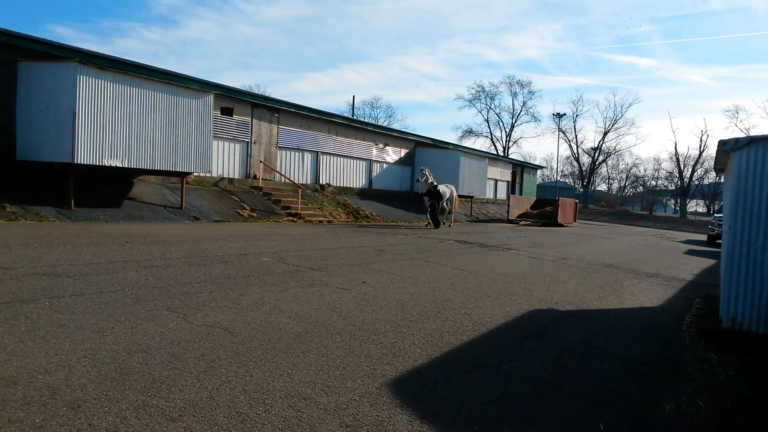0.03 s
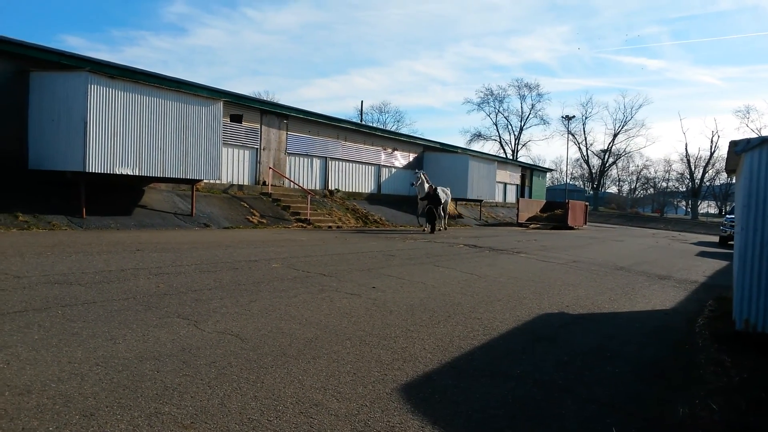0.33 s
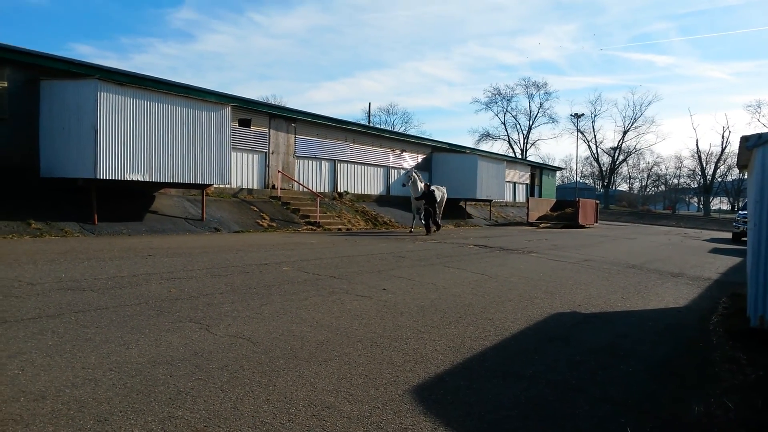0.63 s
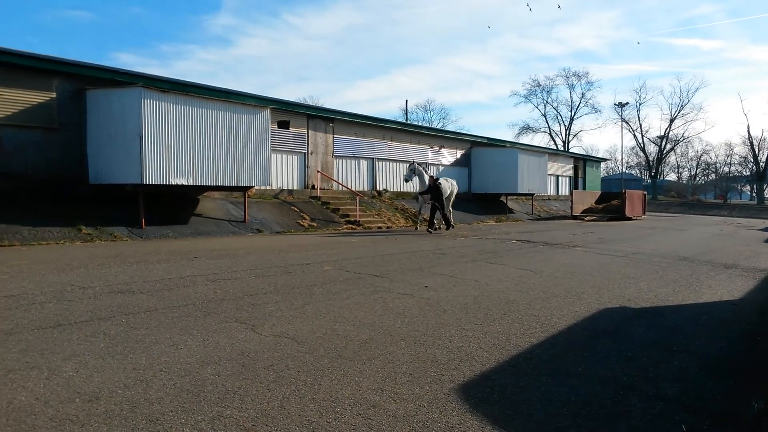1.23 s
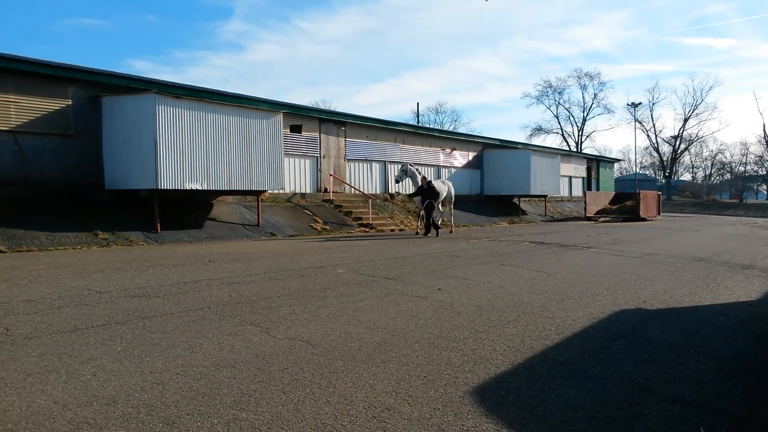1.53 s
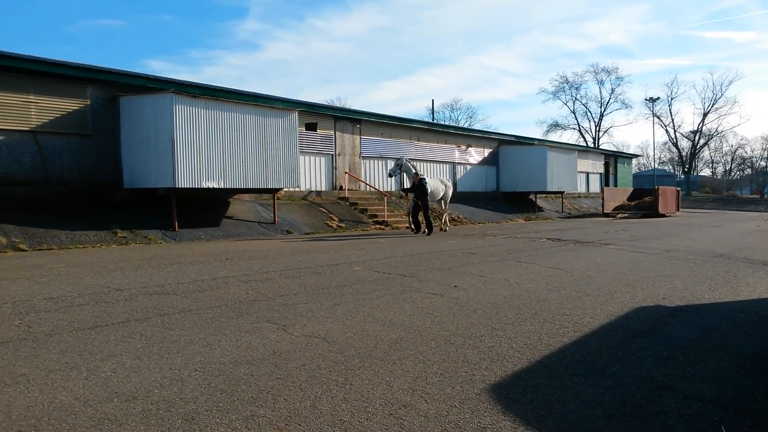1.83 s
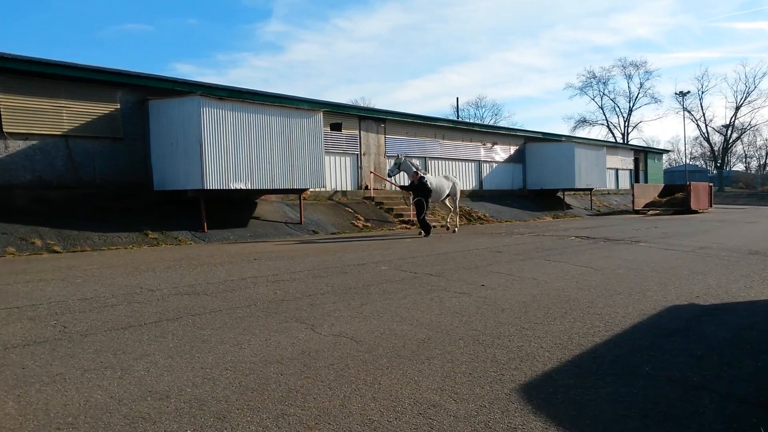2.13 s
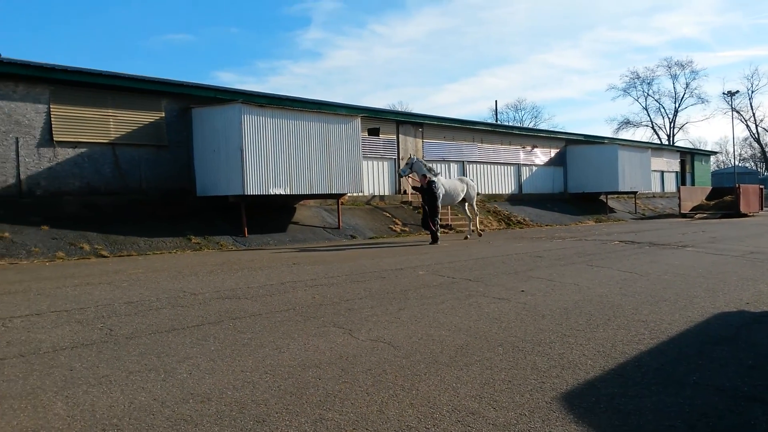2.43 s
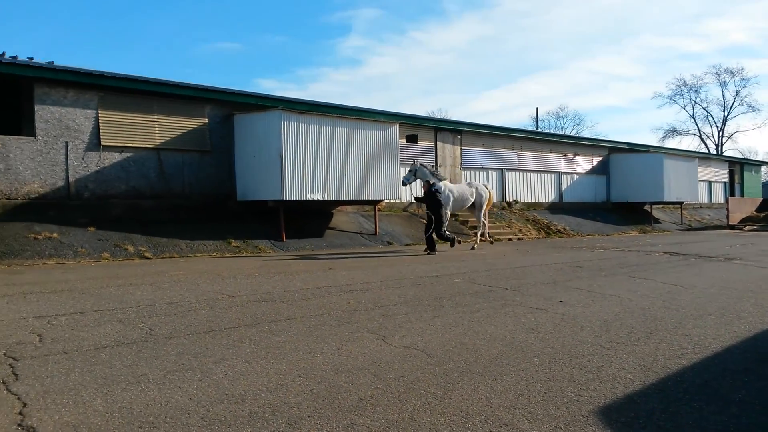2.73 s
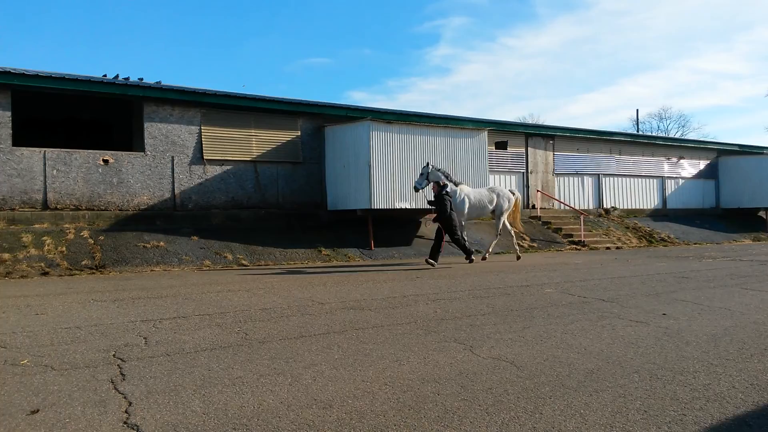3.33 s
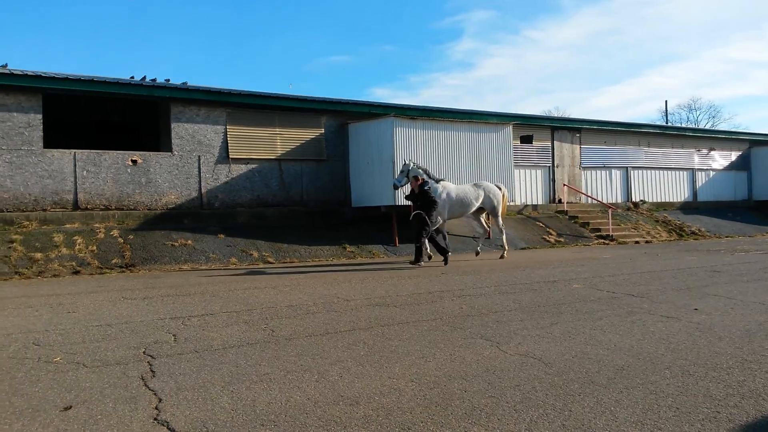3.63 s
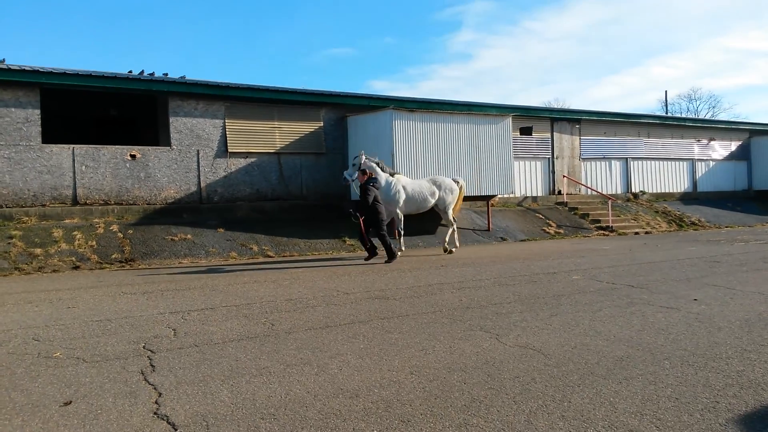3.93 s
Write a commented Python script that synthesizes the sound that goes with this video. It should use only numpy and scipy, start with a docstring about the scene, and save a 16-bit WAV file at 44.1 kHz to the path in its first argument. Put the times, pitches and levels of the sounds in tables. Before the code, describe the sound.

A horse trots steadily on asphalt while gusts of wind buffet the microphone.

```python
"""A horse is led at a trot across an asphalt lot, coming nearer along a low building.
Diagonal pairs of hooves land almost together. Each blow rings the hollow hoof (a clop) and crushes
grit (a crunch), and the walls answer. Shoes scuff between beats, and now and then a stone cracks.
Gusts buffet the microphones over a faint outdoor hiss; a light, even ticking is heard at first."""
import sys
import numpy as np
from scipy import signal
from scipy.io import wavfile
from scipy.ndimage import uniform_filter1d

SR = 44100
rng = np.random.default_rng(int(sys.argv[2]) if len(sys.argv) > 2 else 0)


def master(y):
    """Save y as 16-bit WAV."""
    cut = np.clip(np.atleast_2d(y).T, -1, 1)
    pcm = np.round(cut * 32767)  # scale
    wavfile.write(sys.argv[1], SR, pcm.astype(np.int16))


N = 176400
T = np.arange(N) / SR
LEFT, RIGHT = range(2)
# Two ways a hoof lands: roll_db (compared with the first touch), roll_decay_s, crunch_rise_s
FLAT, DRAGGED = (-3, 0.0029, .0004), (12, 0.01, 0.0034)


def amp(db):
    """Turn decibels into a number to multiply by."""
    return 10 ** (np.asarray(db) / 20)


def rms_one(x):
    """Scale a sound so that its average level (rms) is 1."""
    return x / np.sqrt(np.mean(x ** 2) + 1e-20)


def in_time(rows):
    """Join (time, value) points with straight lines, giving a value for every sample."""
    times, values = np.transpose(rows)
    return np.interp(T, times, values)


def at_hz(rows, hz, column=1):
    """Read a table at any pitch, blending between its rows on an octave scale."""
    rows = np.array(rows)
    return np.interp(np.log(hz), np.log(rows[:, 0]), rows[:, column])


def filt(x, hz, kind, order=2):
    """Keep the "low" part, the "high" part or one "band" of a sound."""
    sections = signal.butter(order, np.clip(hz, 10, .45 * SR), kind, fs=SR, output="sos")
    return signal.sosfilt(sections, x + 1e-18)


def drift(rate_hz):
    """A smooth random wobble with a typical size of 1."""
    step = 40   # samples between the random points
    r = np.exp(-2 * np.pi * rate_hz * step / SR)
    slow = signal.lfilter([1], [1, -2 * r, r * r], rng.standard_normal(N // step + 2002))[2000:]
    return np.interp(np.arange(N) / step, np.arange(len(slow)), rms_one(slow))


def ring(x, hz, ring_s):
    """Each click in x starts a pure tone that fades by 60 dB in ring_s."""
    r = np.exp(-np.log(1000) / (ring_s * SR))
    angle = 2 * np.pi * hz / SR
    return signal.lfilter([0, np.sin(angle)], [1, -2 * r * np.cos(angle), r * r], x + 1e-18)


def linger(energy, seconds):
    """Spread energy out so that it dies away gradually."""
    r = np.exp(-1 / (seconds * SR))
    return signal.lfilter([1 - r], [1, -r], energy + 1e-18)


def add(out, start_s, x):
    """Mix a sound in at a given time."""
    i = int(np.clip(start_s * SR, 0, N - 1))
    out[..., i:i + x.shape[-1]] += x[..., :N - i]


def noise_bands(count, lowest_hz=22):
    """Slices of stereo noise half an octave wide, each with its middle pitch."""
    white = rng.standard_normal((2, 2, N + 8000))
    edges = lowest_hz * 2 ** (np.arange(count + 1) / 2)
    for k in range(count):
        yield np.sqrt(edges[k] * edges[k + 1]), filt(white[k % 2], edges[k:k + 2], "band")[:, -N:]


def crunch(decay_s, per_s=5000, rise_s=0.00092, size=6000):
    """A burst of tiny random clicks that swells and dies away, with a total energy of 1."""
    t = T[:size]
    clicks = (rng.random(size) < per_s / SR) * rng.standard_normal(size)
    grains = clicks * np.exp(-t / decay_s) * (1 - np.exp(-t / rise_s))
    return grains / (np.linalg.norm(grains) + 1e-9)


def outdoor_hiss():
    """Smooth, far-off hiss that is loudest at the start."""
    # The tone of the hiss: pitch_hz, level_db
    tone = [(100, -42.5), (400, -95), (700, -57), (1100, -65), (1600, -66), (2500, -68), (3900, -69),
            (5000, -75), (6500, -72), (9000, -77), (12000, -87), (15000, -69)]
    # How the hiss rises and falls: time_s, level_db
    loudness = [(0, 10.5), (.5, 5.5), (1.0, 7), (2.1, 5.5), (2.5, 7.5), (2.95, 6.5), (3.05, 4), (3.3, 5.5),
                (3.45, -1.5), (4, 0)]
    hiss = sum(noise * amp(at_hz(tone, hz)) for hz, noise in noise_bands(count=19))
    return amp(-49 + in_time(loudness)) * rms_one(hiss)


def ticking(count=20, start_s=.1045, gap_s=.0249):
    """A short run of faint, even ticks close to the microphones."""
    out = np.zeros((2, N))
    for k in range(count):
        burst = np.array([crunch(.001), crunch(.001)]) * amp(rng.normal(0, 1.5))
        top = filt(burst, [9500, 13000], "band")
        body = amp(11) * filt(burst, [2250, 3400], "band")
        add(out, start_s + k * gap_s, amp(-23) * (top + body))
    return out


def wind():
    """Air swirls at each microphone's opening and rumbles; stronger gusts reach higher in pitch."""
    # The tone of the rumble: pitch_hz, left_db, right_db
    tone = [(25, -16, -19.5), (44.7, -8.5, -4.5), (78, 0.5, -2), (126, 2, -3.5), (190.5, -6, -6.5),
            (330, -19.5, -14), (453, -38, -25), (754, -33, -57), (1040, -75, -108)]
    # How hard the wind pushes on the left microphone: time_s, level_db
    gusts_left = [(0.0, -19.5), (0.2, -16), (0.31, -10.5), (0.34, -27.5), (0.45, -18), (0.47, -28),
                  (0.79, -39.5), (0.89, -23.5), (1.19, -40.5), (1.54, -19), (1.6, -28.5), (1.8, -21),
                  (1.94, -32), (2.1, -25.5), (2.28, -32.5), (2.37, -21), (2.43, -34), (2.61, -20.5),
                  (2.63, -26), (2.93, -28.5), (2.97, -18), (3.15, -16.5), (3.17, -20.5), (3.54, -42.5),
                  (3.55, -28), (3.85, -29.5), (3.91, -17.5), (4.0, -32)]
    # The same on the right: time_s, level_db
    gusts_right = [(0.0, -12.5), (0.06, -18), (0.31, -13.5), (0.42, -23.5), (0.60, -26), (0.63, -36.5),
                   (0.87, -31.5), (0.98, -25), (1.02, -23), (1.10, -23.5), (1.25, -33.5), (1.32, -29.5),
                   (1.345, -18), (1.41, -25.5), (1.48, -16.5), (1.53, -27.5), (1.68, -26), (1.735, -13.5),
                   (1.77, -18.5), (1.95, -27), (1.968, -15.5), (2.115, -15.5), (2.135, -26), (2.25, -27),
                   (2.28, -18.5), (2.38, -17), (2.49, -23), (2.61, -12), (2.88, -14.5), (3.03, -13.5),
                   (3.3, -12), (3.33, -25), (3.44, -18.5), (3.56, -35.5), (3.6, -19.5), (3.73, -27),
                   (3.79, -22), (4.0, -27)]
    force_db = np.array([in_time(gusts_left), in_time(gusts_right)]) + 17
    steady_above_db = 8.5   # a stronger flow is steady, a weaker one comes in lumps
    lumpiness = 1 / (1 + amp(force_db - steady_above_db) ** 2)
    lumps_db = 4 * lumpiness * np.array([drift(65), drift(44.6)])
    gusty, calm = 0, 0
    for hz, noise in noise_bands(count=12):
        sides_db = [[at_hz(tone, hz)], [at_hz(tone, hz, column=2)]]
        band = noise * amp(sides_db) * amp(2 * drift(20.6))
        sensitivity = 1 + 0.43 * np.clip(np.log2(hz / 130), -1, 2)   # high bands follow gusts more
        calm = calm + band
        gusty = gusty + band * amp(sensitivity * force_db + lumps_db)
    # Dividing by this evens out the noise's own chance swells.
    calm_level = np.sqrt(uniform_filter1d(calm ** 2, size=1800, axis=1))
    return amp(-16.5) * filt(gusty, 706, "low", order=4) / calm_level


def buffets(ring_cycles=4.26):
    """A swirl of air hits one microphone with a dull thump that dies quickly."""
    # Sudden hits of wind: start_s, side (LEFT or RIGHT), peak_db, pitch_hz
    hits = [(.279, RIGHT, -3, 550), (.291, RIGHT, -0.5, 430), (0.315, RIGHT, -3, 368),
            (0.335, RIGHT, -10.5, 475), (0.363, RIGHT, -6.5, 413), (.893, RIGHT, -10, 139),
            (0.961, RIGHT, -5.5, 126), (.974, RIGHT, -9.5, 300), (1.063, RIGHT, -12, 256),
            (1.351, RIGHT, -7, 190), (1.374, RIGHT, -7, 306), (1.448, RIGHT, -7.5, 243),
            (1.538, LEFT, -13.5, 138.7), (1.571, RIGHT, -7, 174), (1.63, RIGHT, -9, 150),
            (1.725, RIGHT, -14.5, 131), (1.864, RIGHT, -6, 272), (1.987, RIGHT, -5, 266),
            (2.081, RIGHT, -7, 444), (2.11, RIGHT, -2.5, 220), (2.291, RIGHT, -7.5, 336),
            (2.357, RIGHT, -5.5, 397), (2.393, RIGHT, -2.5, 400), (2.601, LEFT, -5, 150),
            (2.714, RIGHT, -9, 520), (2.755, RIGHT, -8, 470), (3.027, RIGHT, -1, 667),
            (3.059, LEFT, -1, 490), (3.093, RIGHT, -9.5, 573), (3.119, RIGHT, -9, 523),
            (3.407, RIGHT, -9.5, 325), (3.44, RIGHT, -6.5, 273), (3.513, RIGHT, -11, 298)]
    out = np.zeros((2, N))
    for start_s, side, peak_db, hz in hits:
        thump = ring(signal.unit_impulse(4096), hz, ring_cycles / hz)
        thump = filt(filt(thump, hz * 0.81, "low"), 92, "high")
        add(out[side], start_s, amp(peak_db) * thump / np.abs(thump).max())
    return out


def lot_echoes(x):
    """The walls send back a few dull echoes, and a soft wash of sound dies away across the lot."""
    # Bounces off the walls: delay_s, level_db
    echoes = [(.021, -15), (0.031, -20.5), (0.08, -14)]
    # The wash of sound: pitch_hz, level_db, fade_s (time to fall by 60 dB)
    wash = [(500, -2.5, 0.16), (946, 1.5, 0.32), (1460, -15.5, 0.88), (3700, 2.5, 0.13), (8000, -38, 0.39),
            (14000, -16, 0.31)]
    out, mono = 0, x.mean(axis=0)
    for hz, noise in noise_bands(count=10, lowest_hz=440):
        energy = filt(mono, [hz / 2 ** .25, hz * 2 ** .25], "band") ** 2
        decay_s = at_hz(wash, hz, column=2) / np.log(10 ** 6)
        late = amp(at_hz(wash, hz)) ** 2 * linger(energy, decay_s)
        early = amp(-5.5) ** 2 * linger(energy, 0.014)
        out = out + rms_one(noise) * np.sqrt(linger(early + late, 0.00047))
    dull = filt(x, 4800, "low")
    for delay_s, level_db in echoes:
        for side, source in zip(out, dull):
            add(side, delay_s * rng.uniform(0.89, 1.03), amp(level_db) * source)
    return out


def loose_grit(per_s=14):
    """Loose grains skitter at random, each ringing briefly at one of three pitches."""
    out = np.zeros(N)
    for hz in (2800, 4000, 9000):
        sizes = amp(4 * np.minimum(rng.exponential(1, N), 3))
        clicks = sizes * (rng.random(N) < per_s / SR)
        out += amp(-54) * ring(clicks, hz, 18 / hz)
    return out


def scuffs():
    """Shoes and toes scrape lightly on the ground between the beats."""
    # Short scrapes: start_s, level_db, pitch_hz, decay_s
    scrapes = [(0.107, -4.5, 1590, 0.0024), (0.657, -4, 1110, 0.0082), (0.853, -5, 1450, 0.0026),
               (1.082, -4, 3000, 0.013), (1.168, -2, 950, .012), (1.208, -9.5, 3870, 0.009),
               (1.369, -6.5, 1900, 0.0033), (1.598, -5, 1820, 0.0086), (1.927, -12, 5800, .02),
               (2.497, -10, 1940, 0.0024), (2.578, -8, 1330, 0.0018), (2.858, -6, 2240, 0.0027),
               (2.948, -8.5, 5360, 0.021), (3.283, -11, 3565, 0.0049), (3.565, -7.5, 3260, 0.0013),
               (3.571, -29, 4000, .001), (3.648, 0, 4230, 0.0062), (3.915, -11, 1920, 0.0018)]
    out = np.zeros(N)
    for start_s, level_db, hz, decay_s in scrapes:
        scrape = filt(crunch(decay_s), [hz / 1.4, hz * 1.4], "band")
        add(out, start_s, amp(level_db - 11.5) * scrape / np.linalg.norm(scrape))
    return out


def stone_cracks():
    """Single stones split under a hoof with a short, bright snap."""
    # Splitting stones: start_s, level_db, pitch_hz
    stones = [(1.473, 2, 4840), (1.8355, 3, 5470), (2.5331, 5, 7100), (2.5383, -2, 7540), (3.653, 4, 4500)]
    out = np.zeros((2, N))
    for start_s, level_db, hz in stones:
        burst = np.array([crunch(0.00032, per_s=20000) for _ in (LEFT, RIGHT)])
        add(out, start_s, amp(level_db + 2) * filt(burst, [hz / 1.18, hz * 1.18], "band"))
    return out


def crushed_grit(rise_s):
    """Grains are crushed as the hoof touches down, then go on grinding under its weight."""
    crush = crunch(0.0096, rise_s=rise_s)
    grind = amp(-1.5) * crunch(0.041, per_s=1200, rise_s=rise_s)
    return filt(filt(crush + grind, 3170, "high"), 9200, "low", order=3)


def clop(pitch_hz, roll_db, roll_decay_s):
    """A hoof strikes, then rolls flat in a run of small knocks; both set its hollow horn ringing."""
    # The tones of a hoof on asphalt: pitch_ratio, level_db, ring_s
    tones = [(.72, -11.5, 0.025), (.93, -5, 0.027), (1.12, -5, 0.031), (1.42, -2.5, 0.0066),
             (1.9, 0.5, 0.0073), (2.3, -3.5, 0.003), (2.8, -16.5, 0.021), (4.3, -12, 0.0055)]
    force = amp(roll_db) * crunch(roll_decay_s, per_s=550)
    force[0] += 1   # the first touch
    out = 0
    for k, (ratio, level_db, ring_s) in enumerate(tones):
        tone = ring(force, pitch_hz * ratio * rng.normal(1, .035), ring_s)
        tone *= np.sqrt(ring_s * SR) / np.linalg.norm(tone)   # a longer ring holds more energy
        out = out + (-1) ** k * amp(level_db) * tone   # every other tone starts the opposite way
    return filt(out, 470, "high")


def hooves(weight_lag_s=0.001567):
    """Each landing crunches grit at once and clops just after, when the weight arrives."""
    # Hoof landings: start_s, clop_db, grit_db, pitch_hz, way of landing (FLAT or DRAGGED)
    landings = [(0.055, 2, -3, 1100, FLAT), (0.405, -0.5, -5, 1080, DRAGGED), (0.4234, 4, 1, 1103, DRAGGED),
                (.757, 0, -5.5, 1053, DRAGGED), (0.7881, 6.5, -5, 1190, FLAT),
                (1.082, -4.5, -26, 900, FLAT), (1.133, 3.5, -3.5, 980, FLAT), (1.1535, 4, -8, 966, FLAT),
                (1.468, -1, 0, 1196, FLAT), (1.488, 3.5, -3.5, 1026, FLAT), (1.830, 4.5, 1.5, 954, DRAGGED),
                (1.838, 7, -22, 1090, FLAT), (2.171, 6.5, 1.5, 973, FLAT), (2.19, -2.5, -3.5, 1020, FLAT),
                (2.1955, -5, -22, 1020, FLAT), (2.5332, -6, 5.5, 1026, FLAT), (2.535, 7.5, -24, 973, FLAT),
                (2.888, 9, 3.5, 1048, FLAT), (3.229, 0.5, 0, 1040, FLAT), (3.2555, 7, -8, 1033, FLAT),
                (3.583, 5.5, 0.5, 1165, FLAT), (3.6225, 8.5, 1.5, 916, FLAT), (3.9517, 7.5, 4, 1097, FLAT),
                (3.966, 5.5, -2.5, 970, FLAT), (3.989, 2, -6, 910, FLAT)]
    out = np.zeros((2, N))
    for start_s, clop_db, grit_db, pitch_hz, (roll_db, roll_decay_s, rise_s) in landings:
        add(out, start_s + weight_lag_s, amp(clop_db - 39) * clop(pitch_hz, roll_db, roll_decay_s))
        grit = np.array([crushed_grit(rise_s), crushed_grit(rise_s)])
        add(out, start_s, amp(grit_db - 8) * grit)
    return out


def microphone(x, peaks):
    """A microphone colours the sound by lifting some pitches and lowering others."""
    for hz, gain_db, sharpness in peaks:
        b, a = signal.iirpeak(hz, max(sharpness * amp(gain_db / 2), .3), fs=SR)
        x = x + (amp(gain_db) - 1) * signal.lfilter(b, a, x)
    return x


def scene():
    """The horse in the lot, heard through two unlike microphones in the wind."""
    # Peaks and dips of the left microphone: pitch_hz, gain_db, sharpness (higher is narrower)
    left_peaks = [(4000, 9.5, 1.63), (9380, -9.5, 0.91), (14000, 9, 7.5)]
    # The same for the right one: pitch_hz, gain_db, sharpness
    right_peaks = [(4500, -8, 0.88), (8190, 4.5, 2.44), (9650, 8, 4.34)]
    steps = hooves() + loose_grit() + scuffs()
    left, right = steps + lot_echoes(steps) + stone_cracks() + outdoor_hiss() + ticking()
    heard = np.array([microphone(left, left_peaks), microphone(right, right_peaks)])
    return heard + wind() + buffets()


def record(dry, cutoff_hz=14600):
    """The loudest peaks are rounded off and the highest treble is cut."""
    rounded = dry / (1 + np.abs(dry / .95) ** 6) ** (1 / 6)
    return signal.sosfilt(signal.ellip(10, .2, 80, cutoff_hz, fs=SR, output="sos"), rounded)


dry = scene()
out = record(dry)
master(out)
```